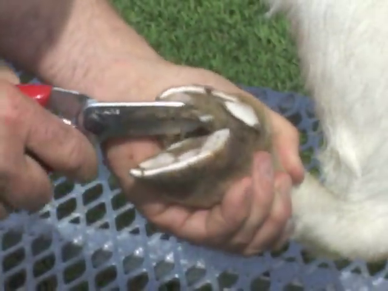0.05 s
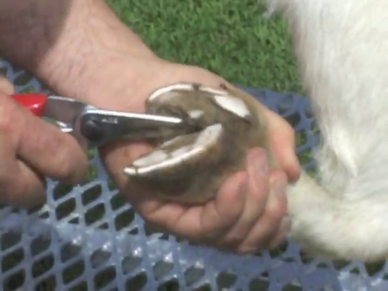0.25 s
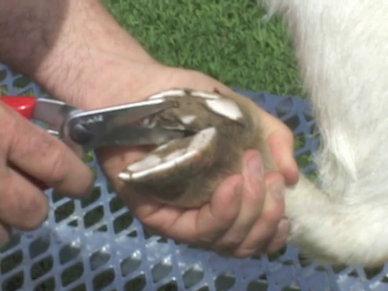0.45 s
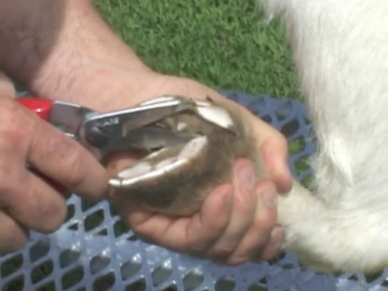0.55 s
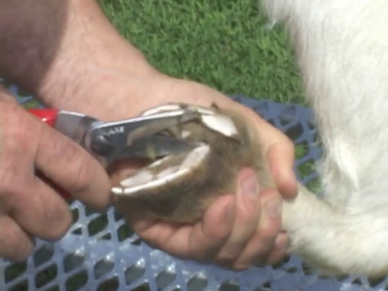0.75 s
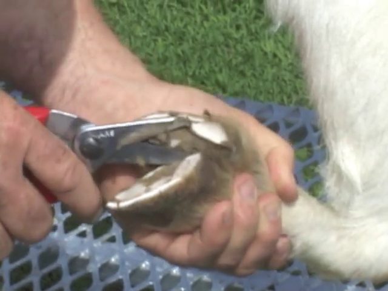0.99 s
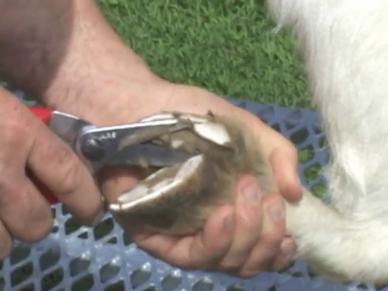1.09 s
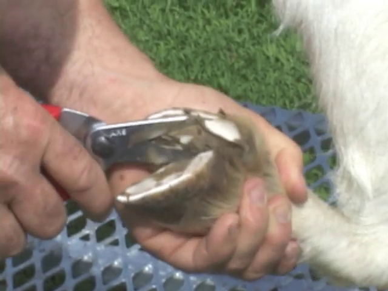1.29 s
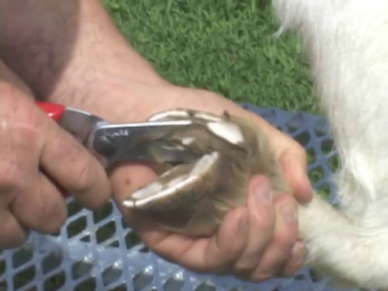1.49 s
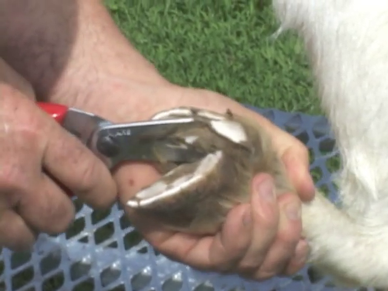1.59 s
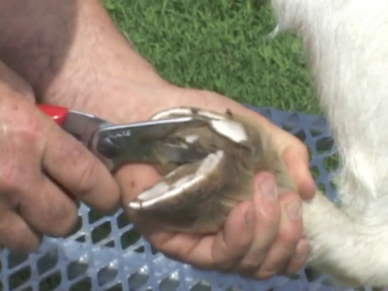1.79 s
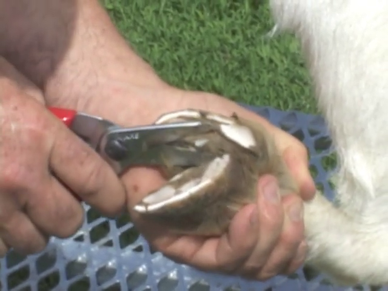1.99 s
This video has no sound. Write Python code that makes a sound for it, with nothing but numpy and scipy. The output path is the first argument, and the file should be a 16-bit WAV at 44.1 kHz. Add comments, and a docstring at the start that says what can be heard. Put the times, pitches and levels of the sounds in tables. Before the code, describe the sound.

Hand shears snip through a goat's hoof once, close by, with a sharp crack and steel clack. Faint squeaks, ticks and scrapes follow as the blades are set again, while wind buffets the microphone outdoors.

```python
"""Wind buffets the microphone in gusts, over outdoor air and a distant hum. Close by, hand shears trim
a goat's hoof: the horn cracks and crunches as the blades bite through, then steel clacks shut on steel.
As the shears are set again, the pivot squeaks faintly, the blades tick and scrape over the hoof,
and hair and hands rustle. A far bird calls near the end. Everything is louder on the left."""
import sys
import numpy as np
from scipy import signal
from scipy.io import wavfile
from scipy.ndimage import uniform_filter1d

SR = 44100
rng = np.random.default_rng(int(sys.argv[2]) if len(sys.argv) > 2 else 0)


def log_audio(samples):
    """Write samples as a 16-bit WAV file to the path given in sys.argv[1]."""
    # one column per channel
    frames = np.atleast_2d(samples).T
    # limit to full scale, then quantise
    limited = np.clip(frames, -1, 1)
    pcm = np.round(limited * 32767).astype(np.int16)
    wavfile.write(sys.argv[1], SR, pcm)


N = 90404
T = np.arange(N) / SR


def from_db(db):
    """Decibels to gain."""
    return 10 ** (np.asarray(db) / 20)


def unit_rms(x):
    """Scale to an rms of 1."""
    return x / np.sqrt(np.mean(x ** 2) + 1e-20)


def fader(points):
    """Ride the gain through (time, level) points."""
    return from_db(np.interp(T, *np.transpose(points)))


def swell(at_s, db, half_width_s):
    """A bell-shaped rise and fall of gain."""
    return from_db(db) * np.exp(-((T - at_s) / half_width_s) ** 2 / 2)


def panned(x, pan_db=9.5):
    """Left louder than right by pan_db, the mean unchanged."""
    gains = from_db([[pan_db / 2], [-pan_db / 2]])
    return x * gains / gains.mean()


def white():
    """White noise."""
    return rng.standard_normal(N)


def drift(rate_hz):
    """A smooth random wander; rms 1."""
    pole = np.exp(-2 * np.pi * rate_hz / SR)
    return unit_rms(signal.lfilter([1], [1, -2 * pole, pole * pole], rng.standard_normal(2 * N))[N:])


def grains(per_s=5000, spread_db=1):
    """Friction grit: dense tiny slips of uneven size."""
    sizes = from_db(spread_db * np.minimum(rng.exponential(1, N), 5))
    return unit_rms(white() * sizes * (rng.random(N) < per_s / SR))


def coloured(spectrum, source=white):
    """Noise through a third-octave equaliser; rms 1."""
    hz, db = np.transpose(spectrum)
    edges = 22 * 2 ** (np.arange(30) / 3)
    noises, out = [source(), source()], 0
    for k, (low, high) in enumerate(zip(edges, edges[1:])):
        if high > hz[0] and low < hz[-1]:
            noise = noises[k % 2]  # neighbouring bands stay independent
            with_preroll = np.r_[noise[-SR // 4:], noise]
            bandpass = signal.butter(3, [low, high], "band", fs=SR, output="sos")
            gain = from_db(np.interp(np.log(low * high) / 2, np.log(hz), db))
            out = out + gain * signal.sosfilt(bandpass, with_preroll)[-N:]
    return unit_rms(out)


def levelled(x, span_s):
    """Hold a noise steady, so that its envelope alone shapes it."""
    power = x ** 2
    for _ in range(2):
        power = uniform_filter1d(power, max(int(span_s * SR), 2))
    return x / np.sqrt(np.abs(power) + 1e-6)


def ring(force, hz, t60):
    """One resonant mode: a unit click rings it at height 1."""
    radius, angle = from_db(-60 / (t60 * SR)), 2 * np.pi * hz / SR
    return signal.lfilter([.5, 0, -.5], [1, -2 * radius * np.cos(angle), radius ** 2], force + 1e-18)


def contact(at_s, decay_s, chatter):
    """A click followed by a dying chatter of smaller slips."""
    start = int(at_s * SR)
    age = (np.arange(N) - start) / SR
    force = chatter * white() * (age >= 0) * np.exp(-np.abs(age) / decay_s)
    force[start] += 1
    return force


def struck(modes, force_at, contact_hz=12300):
    """Ring each mode with force_at(its frequency). A contact takes a moment, which dulls the very top."""
    out = 0
    for k, (hz, db, t60) in enumerate(modes):
        out = out + (-1) ** k * from_db(db) * ring(force_at(hz), hz, t60)
    return signal.sosfilt(signal.butter(2, contact_hz, fs=SR, output="sos"), out + 1e-18)


def whistles(notes, arch_hz, rough_hz):
    """Short arched glides with an unsteady pitch."""
    out, waver = 0, drift(300)
    for at_s, length, start_hz, end_hz, db in notes:
        progress = np.clip((T - at_s) / length, 0, 1)
        arch = np.abs(np.sin(np.pi * progress))
        glide = start_hz + (end_hz - start_hz) * progress
        hz = glide + arch_hz * (arch - .5) + rough_hz * waver
        out = out + from_db(db) * np.sqrt(2 * arch) * np.sin(2 * np.pi * np.cumsum(hz) / SR)
    return out


# fader ride of the gusts: (time [s], level [dB])
GUSTS = [(0.0, -27), (0.15, -58.5), (0.2, -16.5), (0.24, -30), (0.27, -14), (0.32, -18), (0.34, -11),
         (0.38, -9.5), (0.41, -31), (0.43, -23.5), (0.46, -37.5), (0.53, -33), (0.55, -16), (0.71, -36),
         (0.72, -25), (0.79, -28), (0.83, -9), (0.84, -10.5), (0.95, -39.5), (0.96, -43), (1.04, -18),
         (1.06, -34.5), (1.1, -21.5), (1.17, -31), (1.19, -24.5), (1.25, -33), (1.27, -23.5), (1.3, -39),
         (1.34, -23.5), (1.41, -28.5), (1.44, -14.5), (1.48, -30.5), (1.51, -38), (1.96, -52.5), (2.0, -37),
         (2.05, -44)]
# tone of the low rumble: (frequency [Hz], relative density [dB])
RUMBLE_EQ = [(25,-10),(45,-1),(70,3.5),(115,-1.5),(170,-11.5),(260,-29),(400,-46.5)]
# tone of the turbulence above it: (frequency [Hz], relative density [dB])
TURBULENCE_EQ = [(130,-3),(230,5),(310,-5.5),(420,-15),(600,-27),(1000,-31),(2000,-47)]
def wind(turbulence_growth=1.324, low_cut_hz=35, split_hz=62):
    """Gusts on the microphone: turbulence grows faster than rumble, and the deep end leans furthest left."""
    gust = fader(GUSTS)
    rumble = from_db(-1.5) * gust * levelled(coloured(RUMBLE_EQ), span_s=.043)
    turbulence = from_db(-11.5) * gust ** turbulence_growth * coloured(TURBULENCE_EQ)
    mic_low_cut = signal.butter(2, low_cut_hz, "high", fs=SR, output="sos")
    pressure = signal.sosfilt(mic_low_cut, rumble + turbulence + buffets())
    deep = signal.sosfiltfilt(signal.butter(1, split_hz, fs=SR, output="sos"), pressure)
    return panned(deep, pan_db=18.5) + panned(pressure - deep, pan_db=9)


# tone of the ambience bed: (frequency [Hz], relative density [dB])
AIR_EQ = [(30,-1.5),(90,12),(160,-6),(260,-1.5),(370,-8.5),(600,-2),(850,-0.5),(1200,-7),(1700,-15.5),(2600,-16.5),(4000,-24.5),(8000,-24.5),(13000,-31),(15000,-48)]
def outdoor_air(width=.16):
    """A steady bed of open air, widened by a second noise in opposite polarity left and right."""
    centre = panned(coloured(AIR_EQ))
    sides = width * coloured(AIR_EQ) * [[1], [-1]]
    return from_db(-52.5) * (centre + sides)


# partials of the hum: (frequency [Hz], level [dB], width [Hz])
HUM_PARTIALS = [(89.2,-51.5,5.2),(882.4,-61,16)]
def distant_hum():
    """A low and a high tone, each wavering in level and phase."""
    out = 0
    for hz, db, width in HUM_PARTIALS:
        phase = 2 * np.pi * hz * T
        out = out + from_db(db) * (drift(width) * np.sin(phase) + drift(width) * np.cos(phase))
    return out


# fader ride of the rubbing: (time [s], level [dB])
RUB_RIDE = [(0,-63.5),(.06,-68),(.11,-71.5),(.25,-60),(.36,-61.5),(.39,-52),(.45,-62.5),(.53,-69.5),(.60,-62),(.65,-66),(.68,-68),(.80,-67),(.845,-58.5),(.95,-67.5),(1.12,-62),(1.28,-70),(1.47,-63.5),(1.53,-65),(1.59,-68),(1.67,-72.5),(2.05,-71)]
# tone of its grit: (frequency [Hz], relative density [dB])
RUB_EQ = [(1000,4),(2200,0),(3200,-2.5),(5000,-1.5),(6500,-3),(8200,-6.5),(10500,-10.5),(14000,-11.5)]
def rubbing():
    """Blades and fingers rub over the hoof in a fine, gritty scrape."""
    return from_db(2.5) * fader(RUB_RIDE) * coloured(RUB_EQ, grains)


# strokes of the edge: (peak time [s], level [dB], half width [s])
EDGE_STROKES = [(.065,-60,.014),(.19,-62,0.0055),(.395,-53,0.0068),(.455,-59.5,0.027),(.60,-60.5,0.034),(.645,-61,0.0086),(1.118,-64,0.0097),(1.217,-52.5,0.0089),(1.58,-67,0.049),(2.0,-68,0.013)]
def blade_slide(edge_hz=7600, t60=.00071):
    """Tiny slips of the edge over the horn ring the blade in one broad, high band."""
    rasp = ring(ring(grains(), edge_hz, t60), edge_hz, t60)
    return from_db(-1.5) * sum(swell(*stroke) for stroke in EDGE_STROKES) * unit_rms(rasp)


# light ticks of blade on hoof: (time [s], level [dB], chatter decay [s], low-mode boost [dB])
HOOF_TICKS = [(.0755,-39,.0004,-9.5),(0.357,-50,0.00055,13),(0.371,-58,.0008,10),(0.388,-45,.002,8),(.516,-47,0.00091,-5),(1.006,-51.5,.002,14.5),(1.11,-51,.002,5),(1.129,-47,0.00084,8),(1.21,-47,0.0046,16),(1.217,-46.5,0.0027,-5),(1.594,-46,0.00087,-6),(1.755,-50.5,0.00078,-4)]
# cracks of the cut: (time [s], level [dB], chatter decay [s], low-mode boost [dB])
HORN_CRACKS = [(0.1973,-10.5,0.00041,1.5),(.2008,-28,0.00046,3),(0.2031,-20,0.00065,6),(0.2058,-24.5,0.0012,5.5),(0.2139,-25,0.0014,3),(0.219,-42,.0015,-21),(0.2298,-23.5,0.0025,1),(.2322,-25.5,.002,-23)]
# resonances of horn and blade: (frequency [Hz], level [dB], ring time to -60 dB [s])
HORN_MODES = [(700,-18.5,0.0083),(1350,-17.5,0.0034),(1770,-20,0.0086),(2280,-20.5,0.0081),(3130,-21,0.0037),(3940,-16,0.0036),(4770,-20.5,0.0066),(5800,-17,0.0067),(7840,-7,0.0043),(8840,-7,0.0034),(10800,-8.5,0.0013),(12500,-12,.002)]
def horn(crunch_db=-44, crunch_from_s=.198, crunch_to_s=.235, low_below_hz=5000):
    """Light touches, cracks and the crunch between the cracks ring the horn and blade."""
    crunch = from_db(crunch_db) * grains() * (T > crunch_from_s) * (T < crunch_to_s)
    high_force = low_force = crunch
    for at_s, db, decay_s, boost_db in HORN_CRACKS + HOOF_TICKS:
        force = from_db(db) * contact(at_s, decay_s, chatter=.43)
        high_force = high_force + force
        low_force = low_force + force * from_db(boost_db)
    return struck(HORN_MODES, lambda hz: low_force if hz < low_below_hz else high_force)


def reflections(hits, send_db=-20.5, t60=.069):
    """A brief scatter from the stand and the bodies nearby."""
    tail = white() * from_db(-60 * T / t60)
    return from_db(send_db) * signal.fftconvolve(hits, tail / np.linalg.norm(tail))[:N]


# the wind's hardest hits: (time [s], level [dB], half width [s], eddy pitch [Hz])
WIND_HITS = [(0.2,-27,0.0056,106),(.282,-26,0.011,140),(.341,-8.5,.005,224),(0.369,-8.5,0.0064,119),(0.559,-18,0.0036,184),(0.62,-39,0.0034,174.4),(0.739,-33,0.0087,95),(0.825,-21,0.014,234.3),(0.839,-16.5,.008,73),(.872,-30,0.0091,213),(1.032,-23.5,0.0059,131),(1.267,-40,0.0059,128),(1.443,-24.5,0.0024,147)]
# tone of their flutter: (frequency [Hz], relative density [dB])
FLUTTER_EQ = [(60,7.5),(120,2),(280,1),(400,-12),(600,-24),(1000,-39.5),(2000,-54),(5000,-56)]
def buffets(slap_growth=1.6, slap_rise_s=.0011):
    """Each buffet is a brief eddy wrapped in noise; its steep front slaps in one short pressure swing."""
    flutter = from_db(-5) * levelled(coloured(FLUTTER_EQ), span_s=.01)
    out = 0
    for at_s, db, half_width_s, hz in WIND_HITS:
        eddy = from_db(-2.5) * np.sin(2 * np.pi * (hz * (T - at_s) + rng.random()))
        age = np.maximum(T - at_s, 0) / slap_rise_s
        slap = from_db(6.5 + slap_growth * db) * age * (2 - age) * np.exp(-age)
        out = out + swell(at_s, db, half_width_s) * (flutter + eddy) + slap
    return out


# the blades hit their stop: (time [s], level [dB])
STOP_HITS = [(0.2354,-5.5),(0.2366,-11.5)]
# resonances of the shears: (frequency [Hz], level [dB], ring time to -60 dB [s])
STEEL_MODES = [(920,-39,0.011),(2120,-26.5,.012),(2710,-29,0.011),(3870,-17,0.0097),(4450,-15,0.011),(5170,-13.5,0.0051),(6160,-5,0.0085),(6493,-11,0.0073),(7000,-23,0.027),(8050,-5.5,0.0033),(9720,-19.5,.006),(11800,-22.5,0.0032)]
def clack():
    """The blades break through and snap shut, steel on steel."""
    force = sum(from_db(db) * contact(at_s, decay_s=.00042, chatter=.15) for at_s, db in STOP_HITS)
    return struck(STEEL_MODES, lambda hz: force)


# squeak cues: (time [s], length [s], glide from [Hz], glide to [Hz], level [dB])
PIVOT_SQUEAKS = [(.263,.032,5000,4760,-51),(.296,0.037,4740,4520,-56.5),(1.130,0.021,4820,5050,-55.5),(1.151,0.027,4810,4750,-47.5),(1.183,.032,4850,4680,-56)]
def pivot_squeaks():
    """The pivot gives thin, rough squeaks as the shears are set again."""
    return whistles(PIVOT_SQUEAKS, arch_hz=200, rough_hz=140)


# rustle cues: (peak time [s], level [dB], half width [s])
RUSTLE_SWELLS = [(.32,-61,0.021),(.97,-64,0.043),(1.11,-59,.05),(1.23,-62,0.037),(1.48,-62,0.041)]
# tone of the rustle: (frequency [Hz], relative density [dB])
RUSTLE_EQ = [(1200,4),(2000,-4.5),(2700,1.5),(3400,-3.5),(4500,-27)]
def rustle():
    """Hair and hands brush in soft swells of noise."""
    return sum(swell(*cue) for cue in RUSTLE_SWELLS) * coloured(RUSTLE_EQ)


# the bird's phrase: (time [s], length [s], glide from [Hz], glide to [Hz], level [dB])
BIRD_NOTES = [(1.73,0.083,2710,2630,-65),(1.88,0.063,2800,2770,-67.5),(1.938,0.057,2760,2690,-64),(2.0,0.05,2760,2730,-67)]
def far_bird():
    """Four faint whistled notes, each sagging a little in pitch."""
    return whistles(BIRD_NOTES, arch_hz=32, rough_hz=71.5)


def scene():
    """Shears close by, wind on the microphone, the field behind."""
    hits = horn() + clack()
    handling = rubbing() + blade_slide() + rustle()
    shears = hits + reflections(hits) + handling + pivot_squeaks()
    return panned(shears) + wind() + panned(distant_hum() + far_bird()) + outdoor_air()


def record(dry, high_cut_hz=15700):
    """A soft clipper rounds the peaks at full scale, then a steep filter cuts the top."""
    clipped = dry / (1 + dry ** 8) ** (1 / 8)
    return signal.sosfilt(signal.cheby2(12, 60, high_cut_hz, fs=SR, output="sos"), clipped)


dry = scene()
out = record(dry)
log_audio(out)
```